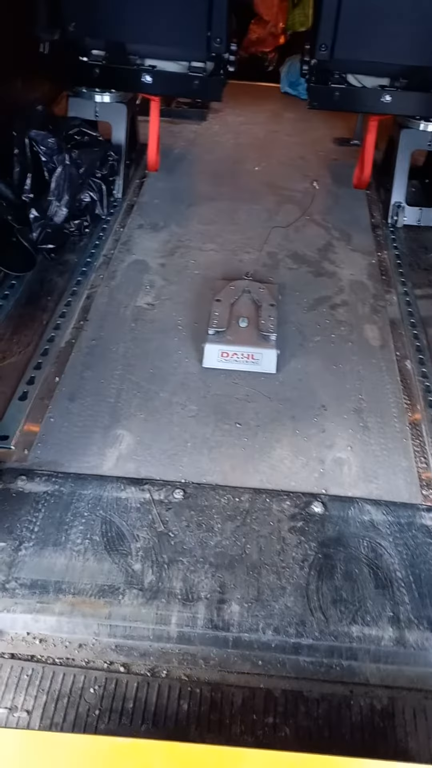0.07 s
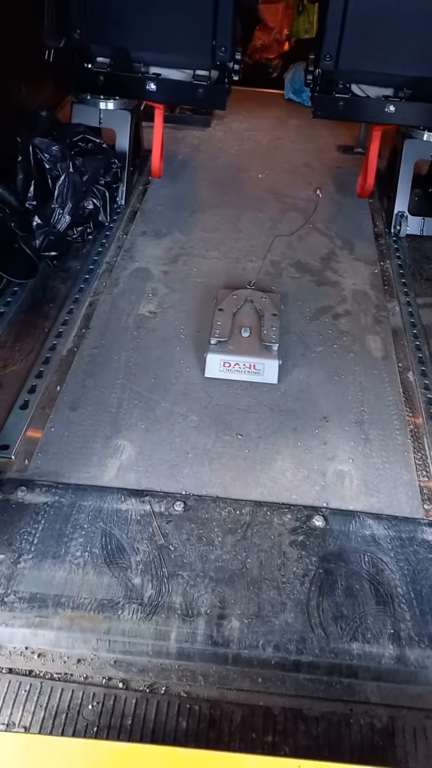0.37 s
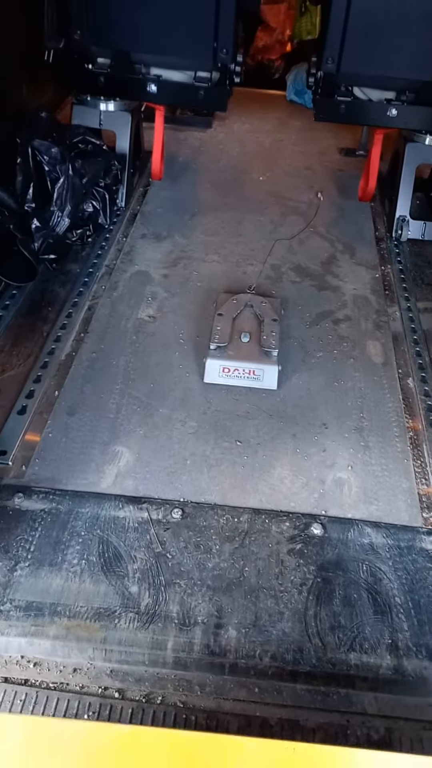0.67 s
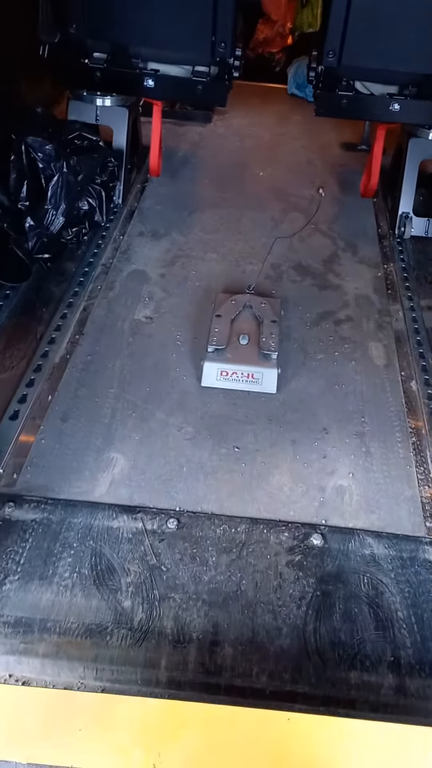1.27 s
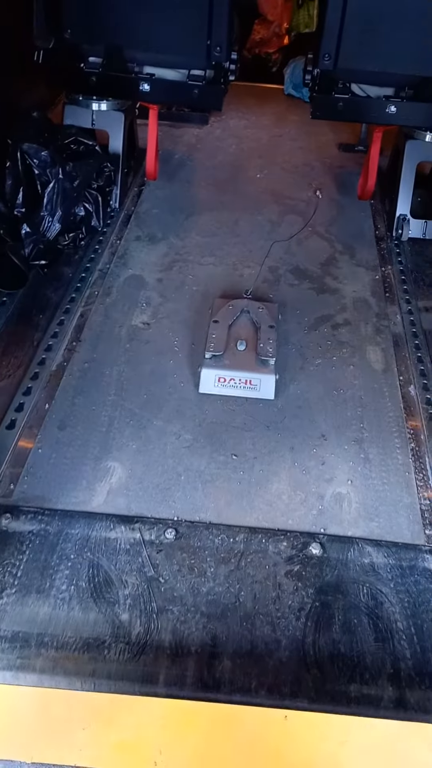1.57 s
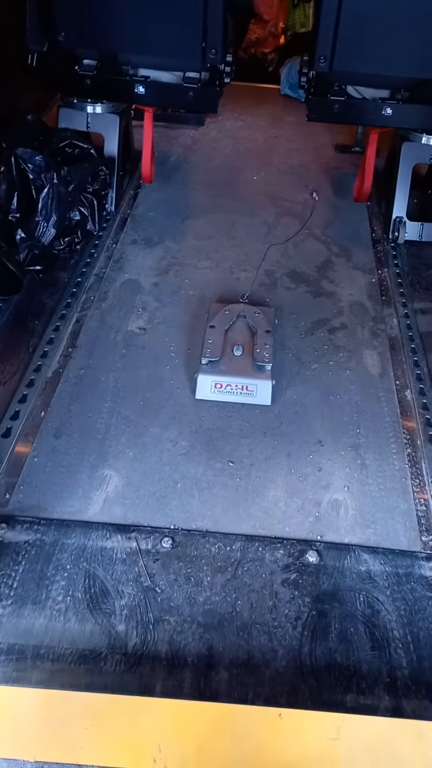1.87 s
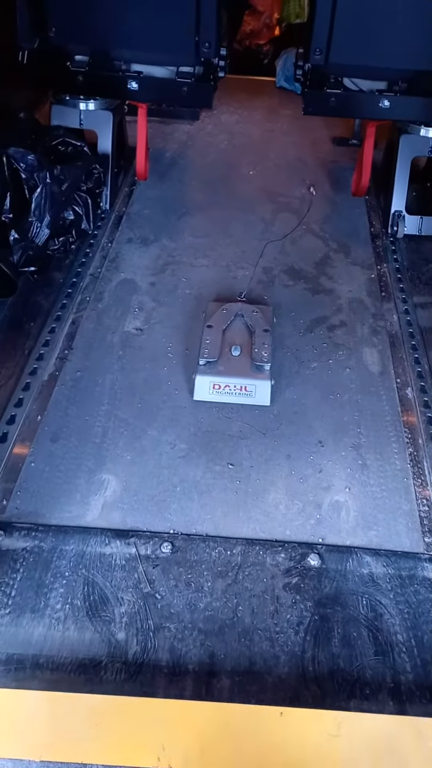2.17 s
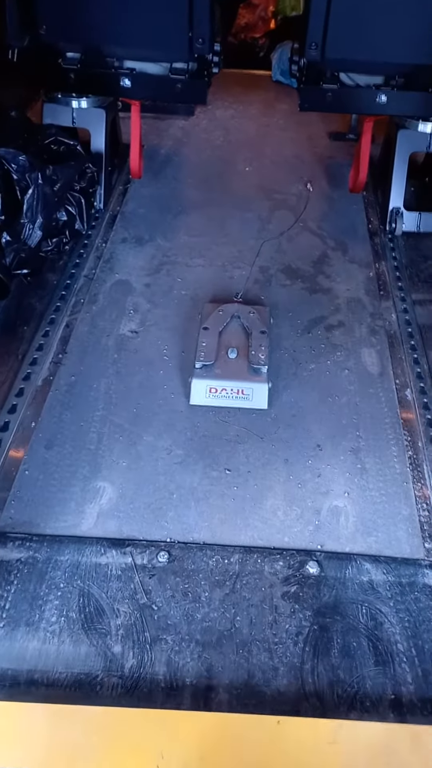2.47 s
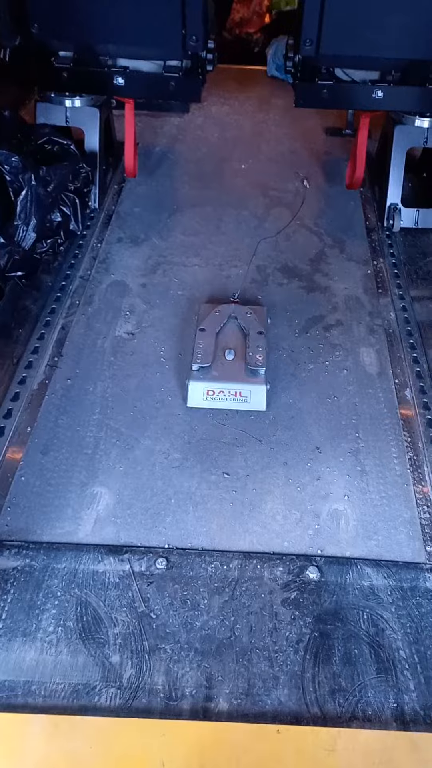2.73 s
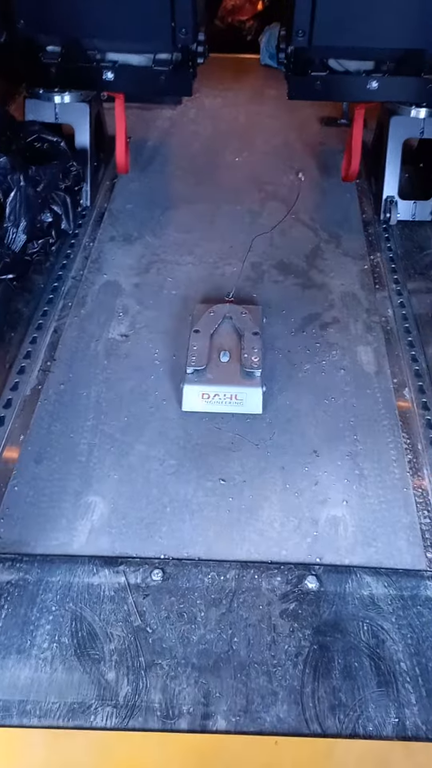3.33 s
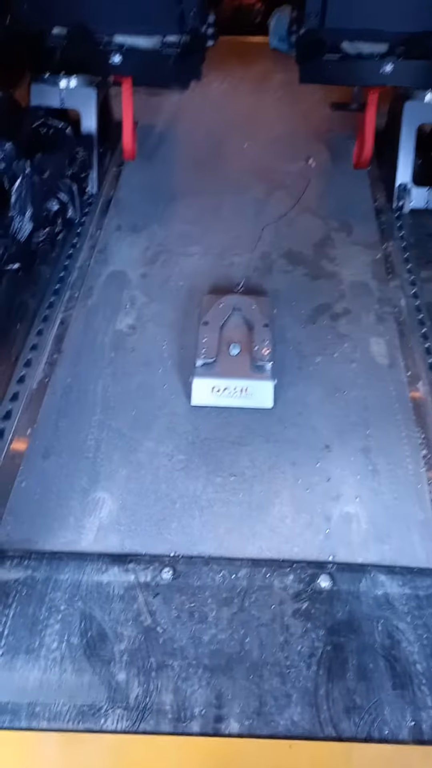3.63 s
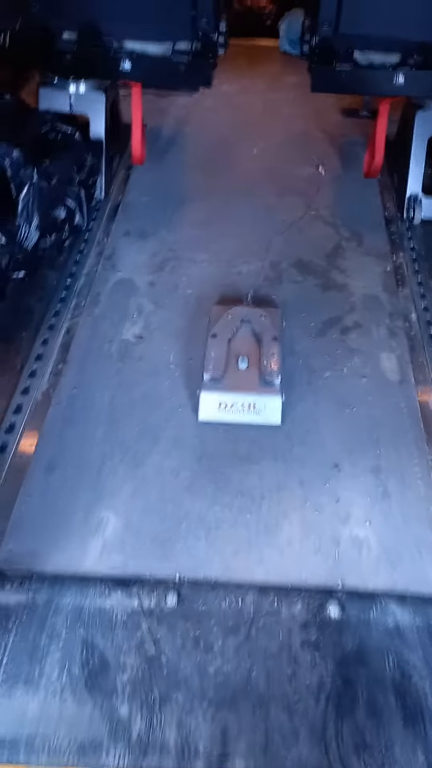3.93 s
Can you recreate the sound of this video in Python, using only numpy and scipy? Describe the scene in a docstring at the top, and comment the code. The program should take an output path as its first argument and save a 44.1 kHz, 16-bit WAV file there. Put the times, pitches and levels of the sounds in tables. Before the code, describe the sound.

A wheelchair lift's hydraulic pump whines steadily with hiss and a rough growl, heard close inside a van. The platform thumps to a stop, the motor dies, and a metal flap clacks before small clicks in the quiet cabin.

```python
"""Wheelchair lift in a van

The lift's electric hydraulic pump whines, slowly gaining speed, with squealing brushes, a growling
bearing and hissing oil. The platform thumps and clunks into its stop and the motor runs down at once.
A metal flap clacks; small clicks and shuffling fill the quiet cabin, and a faint electrical whistle ends."""
import sys
import numpy as np
from scipy import signal
from scipy.fft import rfft, irfft, next_fast_len
from scipy.io import wavfile
from scipy.ndimage import map_coordinates

SR = 44100
rng = np.random.default_rng(int(sys.argv[2]) if len(sys.argv) > 2 else 0)


def wrap_up_sound(samples):
    """Save the sound to the file named by the first command line argument, as 16-bit audio."""
    columns = np.atleast_2d(samples).T
    # keep every value between -1 and 1, then stretch to whole-number steps
    tamed = np.clip(columns, -1, 1)
    steps = np.round(tamed * 32767).astype(np.int16)
    wavfile.write(sys.argv[1], SR, steps)


N = 176400

# motor speed under power: t/s, shaft rate/Hz
SHAFT_SPEED = [(0, 60.02), (2.97, 61.69)]
WHINE_ORDER = 23  # cycles per shaft turn


def pump():
    """One shaft drives the pump and shakes its frame, then coasts to rest when the power is cut."""
    # frame shudder: f/Hz, level/dB
    frame_spectrum = [(40, -30), (60, -14), (90, -15.5), (190, -19), (275, -8), (500, -12.5), (700, -1.5),
                      (930, -0.5), (1200, -26)]
    cut_s, coast_s, unload_s = 2.967, .16, 0.02
    rate, = curves(SHAFT_SPEED)
    off_s = np.maximum(np.arange(N) / SR - cut_s, 0)
    speed = np.clip(1 - off_s / coast_s, 0, 1)
    load = np.exp(-off_s / unload_s)  # the whines die with the pressure
    turns = np.cumsum(rate * speed) / SR + 0.00089 * wobble(40)
    rattle = (1 - load) * grind(turns)
    running = bearing(turns, speed) + hiss(turns) + amp(-43) * noise(frame_spectrum)
    return load * (whine(turns) + squeals(turns)) + speed ** 1.1 * (running + rattle)


def whine(turns):
    """Pump teeth and commutator sing at multiples of the shaft speed."""
    # main whine and its octave: t/s, main level/dB, octave level/dB, main pan/dB
    envelope = [(0, -41, -42.5, 11), (.2, -39, -42.5, 11), (.62, -32, -46.5, 10), (1, -31, -49.5, 5),
                (1.3, -31, -44.5, 2), (1.65, -31, -37, 0), (2.2, -31.5, -37.5, 1.5),
                (2.55, -34.5, -37.5, 4), (2.95, -40, -39, 1.5)]
    # quieter partials: cycles per shaft turn
    orders = (2, 4, 5, 6, 7, 10, 11, 17, 22, 24, 34, 69)
    # for each partial: starting level/dB, rise/(dB/s), pan/dB, left lead/rad
    partials = [(-55, 3, 0.5, 0.2), (-52.5, -1, -1, 0.5), (-47, -0.45, -4.5, 0), (-49.5, 1.55, -14, 1.5),
                (-60.5, 2, 15, 4.5), (-55.5, 2.5, 0, 0), (-55, 1.5, 2, -1.5), (-45.5, 2, -2, -2.5),
                (-52.5, 1.5, 24, -4), (-54, 0.6, 14, 1), (-44.5, -4.5, 7, 1.5), (-57, 2.5, 11, 0.5)]
    drift_db, drift_hz = 1.77, 4.32
    main_db, octave_db, main_pan_db = curves(envelope)
    t = np.arange(N) / SR
    out = amp(main_db) * tone(turns, WHINE_ORDER, main_pan_db, lead=-1.98)
    out += amp(octave_db) * tone(turns, 2 * WHINE_ORDER, pan_db=6, lead=0)
    for order, (db, rise, pan_db, lead) in zip(orders, partials):
        level = amp(db + rise * t + drift_db * wobble(drift_hz))
        out += level * tone(turns, order, pan_db + drift_db * wobble(drift_hz), lead)
    return out


def squeals(turns):
    """The brushes sing in short, rough, wavering spells on high shaft orders."""
    # squeal peaks: t/s, shaft order, level/dB
    spells = [(0.1, 187, -46), (0.62, 238, -44), (1.2, 187, -44.5), (1.2, 221, -45), (1.35, 238, -46),
              (1.72, 221, -43), (2.25, 187, -47), (2.35, 221, -45)]
    chatter = .095 * wobble(150)
    out = 0
    for s, order, db in spells:
        level = amp(db + 2.2 * wobble(20)) * swell(s, width_s=0.21)
        out += level * tone(order * turns + chatter, 1, pan_db=-5, lead=1)
    return out


def bearing(turns, speed):
    """Resonances throb with the ball cage, while a slow beat makes them warble together in pitch."""
    # growl bands: nominal f/Hz, width/Hz, level/dB, pan/dB
    resonances = [(613, 22, -51, 6), (667, 23, -59, -1), (768, 38, -45, -25), (822.7, 22, -38, 8.5),
                  (852, 47, -46, -4)]
    cage_ratio, beat_hz, surge_hz, detune = .383, 4.7, 3.01, 0.99
    clock = np.cumsum(speed) / SR  # slows as the motor coasts
    cage = 2 * np.pi * cage_ratio * turns + 0.25 * wobble(surge_hz)
    beat = 2 * np.pi * beat_hz * clock + .5 * wobble(surge_hz)
    throb = 1 + 0.56 * np.sin(cage)
    warble = .75 * np.sin(beat) + .15 * np.cos(cage + beat)
    out = 0
    for hz, width, db, pan_db in resonances:
        level = amp(db) * unit(throb * amp(wobble(width)))
        cycles = hz * clock + warble + 0.15 * wobble(width)
        out += level * tone(cycles, detune, pan_db, lead=0.86)
    return out


def hiss(turns):
    """Oil hiss pulsing with the shaft, and the slowly changing scrape of the brushes."""
    # oil hiss: f/Hz, level/dB
    oil_spectrum = [(300, -52), (1300, 1), (1620, -11), (1850, -3.5), (2300, -8.5), (3400, -9),
                    (4400, -0.5), (6500, -4), (9500, -10), (12000, 0.5), (15800, -3)]
    # brush scrape: f/Hz, level/dB
    brush_spectrum = [(300, -24), (1300, -1), (1620, -17), (1780, 1), (2300, -22), (2720, 2), (3400, -16),
                      (4200, 1), (4550, -4), (9500, -5), (12500, -1.5), (15800, -5.5)]
    blend = np.arange(N) / SR + .5 * wobble(1.8)
    scraping = np.cos(blend) * scrape(turns) + np.sin(blend) * scrape(turns)
    brushes = unit(filtered(scraping, lambda hz: amp(along(brush_spectrum, hz))))
    pulse = 1 + 0.3 * np.sin(2 * np.pi * turns) * np.cos(4 * np.pi * turns)
    return amp(-36.5) * pulse * combed(noise(oil_spectrum)) + amp(-40.5) * brushes


def scrape(turns):
    """The brushes ride a rough track once per turn: a comb of uneven shaft orders."""
    turn_samples = int(SR / SHAFT_SPEED[0][1])
    white = rfft(rng.standard_normal((2, turn_samples)))
    uneven_db = 4.5 * np.clip(rng.standard_normal(white.shape[1]), -2, 2)
    tracks = irfft(white * amp(uneven_db))
    position = turns % 1 * tracks.shape[1]
    return np.array([map_coordinates(track, [position], mode="grid-wrap") for track in tracks])


def grind(turns):
    """Unloaded pump teeth rattle: the whine roughened in level and phase."""
    level = amp(-31.5 + 3 * wobble(200))
    cycles = WHINE_ORDER * turns + 0.43 * wobble(250)
    return level * tone(cycles, 1, pan_db=7.5, lead=0)


def platform():
    """The platform rings with dull thumps and clunks against its stop."""
    # thumps: t/s, level/dB
    thumps = [(0.66, -45), (2.858, -23.5), (2.872, -28), (2.888, -31), (2.974, -26), (3.008, -29),
              (3.076, -33), (3.51, -48.5), (3.812, -46)]
    # platform modes: f/Hz, level/dB, t60/s
    modes = [(88, -11, 0.27), (139.7, -13.5, 0.27), (240, -7.5, 0.16), (273.5, 0, 0.16), (321, -1.5, 0.14),
             (436, -4.5, 0.13)]
    # hits on the stop: t/s, level/dB
    clunks = [(2.9718, -16.5), (2.979, -21)]
    # clunk colour: f/Hz, level/dB
    spectrum = [(88, -30), (150, -25), (283, -1), (578, -20), (1090, -4.5), (2100, -19), (2860, -14.5),
                (4050, -27), (15000, -27)]
    # clunk decay: f/Hz, t60/s
    decay = [(200, 0.15), (1500, 0.16), (10000, 0.067)]
    out = np.zeros((2, N))
    for s, db in thumps:
        add(out, s, amp(db) * ring(modes, attack_s=0.0043) * panned(-2.5))
    for s, db in clunks:
        add(out, s, amp(db) * burst(spectrum, decay))
    return out


def flap():
    """A metal flap falls against the platform with a double clack and a short ring."""
    # hits: t/s, level/dB
    clacks = [(3.272, -23), (3.279, -26)]
    # clack colour: f/Hz, level/dB
    spectrum = [(100, -59), (260, -6.5), (650, -11), (1200, -3.5), (1500, 3.5), (2000, -1), (2500, -10),
                (3000, -10), (4500, -17), (14000, -21)]
    # clack decay: f/Hz, t60/s
    decay = [(200, 0.32), (1500, 0.18), (10000, 0.21)]
    # flap modes: f/Hz, level/dB, t60/s
    modes = [(1307, 1, 0.12), (1435, 11, 0.11), (2940, -3, 0.2)]
    out = np.zeros((2, N))
    for s, db in clacks:
        add(out, s, amp(db) * burst(spectrum, decay))
    ringing = np.array([ring(modes, attack_s=.001) for _ in range(2)])
    add(out, clacks[0][0], amp(-32) * ringing)
    return out


def clicks():
    """The settling lift ticks, each tick followed by the cabin's brief echo."""
    # ticks: t/s, level/dB, treble tilt/(dB/octave)
    ticks = [(3.190, -37, 3), (3.227, -34, -2), (3.405, -35, -3.5), (3.412, -33, -3.5), (3.575, -36, 1),
             (3.593, -30, 0), (3.611, -35.5, 1.5), (3.651, -38, -0.5), (3.679, -38.5, -1.5),
             (3.813, -37, -3), (3.949, -28, 7.5), (3.992, -34.5, 1)]
    # tick colour: f/Hz, level/dB
    spectrum = [(200, -37), (700, -6), (1200, -1.5), (1900, -1), (2700, 3.5), (3600, -6.5), (4800, -3),
                (6500, -13), (11000, -12.5), (15500, -22)]
    out, t = np.zeros((2, N)), np.arange(SR // 4) / SR
    for s, db, tilt_db in ticks:
        tick = noise(spectrum, len(t), tilt_db) * fade(t, t60=0.011)
        echo = noise(spectrum, len(t), tilt_db / 2) * fade(t, t60=0.12)
        add(out, s, amp(db) * (tick + amp(-10.5) * echo))
    return out


def cabin():
    """Uneven shuffling and soft swishes over the still air of the van."""
    # shuffle envelope: t/s, level/dB
    envelope = [(3.1, -54.5), (3.24, -47.5), (3.36, -54.5), (3.48, -60.5), (3.52, -57.5), (3.66, -66),
                (3.77, -52), (3.83, -50), (3.91, -50), (4, -50)]
    # shuffle colour: f/Hz, level/dB
    scuff_spectrum = [(30, -29), (110, -4), (200, -12.5), (330, 0), (450, -11.5), (1400, -13), (2700, -18),
                      (4200, -23.5), (15500, -33)]
    # swish peaks: t/s, level/dB
    peaks = [(3.525, -53), (3.965, -51)]
    # swish colour: f/Hz, level/dB
    swish_spectrum = [(2000, -9), (9000, -10)]
    # room tone: f/Hz, level/dB
    air_spectrum = [(25, -24), (110, -19), (330, -22), (1000, -6), (3000, -10), (15500, -19)]
    level_db, = curves(envelope)
    swishes = sum(amp(db) * swell(s, width_s=0.03) for s, db in peaks) * noise(swish_spectrum)
    shuffling = amp(level_db + 1.37 * wobble(45)) * noise(scuff_spectrum)
    return shuffling + swishes + amp(-64) * noise(air_spectrum)


def whistle(hz=4007, end_s=3.53):
    """A thin electrical tone that outlasts the motor by half a second."""
    # whistle envelope: t/s, level/dB
    envelope = [(0, -50), (3.1, -66), (3.5, -60)]
    t = np.arange(N) / SR
    level_db, = curves(envelope)
    release = fade(np.maximum(t - end_s, 0), t60=0.11)
    return amp(level_db) * release * tone(t, hz, pan_db=-1.2, lead=2.1)


def tone(cycles, order, pan_db, lead):
    """A stereo sine at a multiple of a cycle count; the left is pan_db louder and lead radians ahead."""
    sides = np.array([[1], [-1]]) / 2
    gains = amp(sides * pan_db)
    return 2 * gains / np.linalg.norm(gains, axis=0) * np.sin(2 * np.pi * order * cycles + sides * lead)


def ring(modes, attack_s):
    """Damped modes, struck a little differently each time."""
    t = np.arange(SR // 2) / SR
    out = 0
    for hz, db, t60 in modes:
        level = amp(db + rng.normal(0, 2.8))
        out += level * np.sin(2 * np.pi * (hz * t + rng.random())) * fade(t, t60)
    return out * (1 - np.exp(-t / attack_s))


def burst(spectrum, t60s, attack_s=0.0013):
    """A dense ring that builds quickly and whose bands die at their own speeds."""
    hz, t, bands = signal.stft(noise(spectrum, size=SR // 2), SR, nperseg=128)
    envelope = fade(t, along(t60s, hz)[:, None]) * (1 - np.exp(-t / attack_s))
    return signal.istft(bands * envelope, SR, nperseg=128)[1]


def noise(spectrum, size=N, tilt_db=0):
    """Coloured stereo noise of rms 1, near mono in the bass."""
    # stereo image: f/Hz, left-right correlation
    likeness = [(60, 0.91), (250, 0.75), (600, 0.55), (1200, 0.03), (15000, 0.032)]

    def gain(hz):
        width = np.arccos(np.clip(along(likeness, hz), -1, 1)) / 2
        colour = amp(along(spectrum, hz) + tilt_db * np.log2(hz + 1))
        return colour * [np.cos(width), np.sin(width)]

    mid, side = filtered(rng.standard_normal((2, size)), gain)
    return unit(np.array([mid + side, mid - side]))


def combed(x, depth_db=3, spacing_hz=130):
    """Still peaks and dips along frequency, different on each side."""
    knots = rng.standard_normal((2, SR // 16))
    ripple = lambda hz: np.array([map_coordinates(k, [hz / spacing_hz], order=1) for k in knots])
    return unit(filtered(x, lambda hz: amp(depth_db * ripple(hz))))


def filtered(x, gain):
    """x times a gain that depends on frequency."""
    n = x.shape[-1]
    padded = next_fast_len(n + SR // 8)
    return irfft(rfft(x, padded) * gain(np.fft.rfftfreq(padded, 1 / SR)), padded)[..., :n]


def wobble(rate):
    """A smooth random curve, rate knots a second."""
    return map_coordinates(rng.standard_normal(int(N * rate / SR) + 4), [np.arange(N) * rate / SR])


def swell(s, width_s):
    """A smooth rise and fall around time s."""
    return np.exp(-((np.arange(N) / SR - s) / width_s) ** 2)


def fade(t, t60):
    return np.exp(-np.log(1000) * t / t60)


def curves(rows):
    """One value per sample for each column after the time."""
    times, *columns = np.transpose(rows)
    return [np.interp(np.arange(N) / SR, times, column) for column in columns]


def along(points, hz):
    """Interpolate (f/Hz, value) points on a log frequency axis."""
    freqs, values = np.transpose(points)
    return np.interp(np.log(hz + 1), np.log(freqs + 1), values)


def panned(pan_db):
    """Left and right gains of constant power."""
    return unit(amp(np.array([[pan_db], [-pan_db]]) / 2))


def add(out, s, sound):
    """Mix a sound in at time s."""
    part = out[:, round(s * SR):][:, :sound.shape[-1]]
    part += sound[..., :part.shape[1]]


def amp(db):
    return 10 ** (np.asarray(db) / 20)


def unit(x):
    return x / np.sqrt(np.mean(x ** 2) + 1e-20)


def scene():
    return pump() + platform() + flap() + clicks() + cabin() + whistle()


def record(dry, rumble_hz=32, top_hz=15900):
    """Roll off the deep rumble and cut the very top of the treble."""
    low_cut = signal.butter(3, rumble_hz, "high", fs=SR, output="sos")
    return filtered(signal.sosfilt(low_cut, dry), lambda hz: hz < top_hz)


dry = scene()
out = record(dry)
wrap_up_sound(out)
```